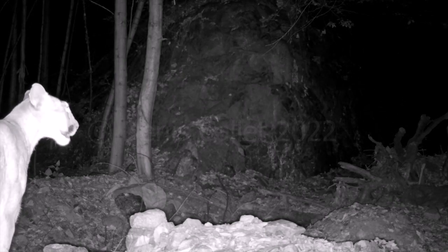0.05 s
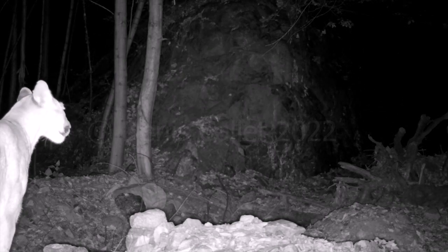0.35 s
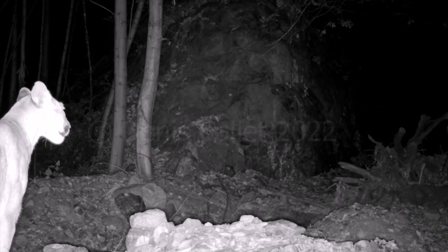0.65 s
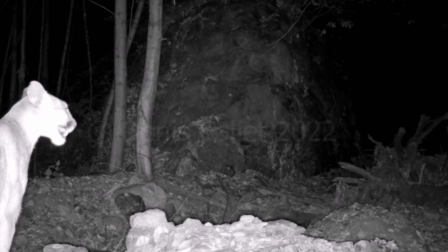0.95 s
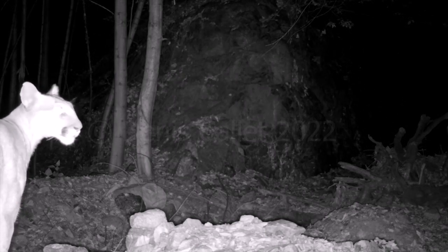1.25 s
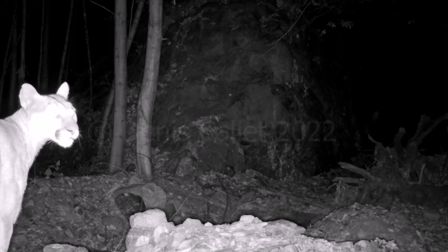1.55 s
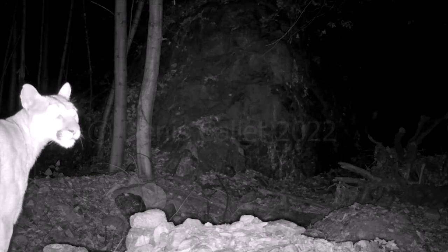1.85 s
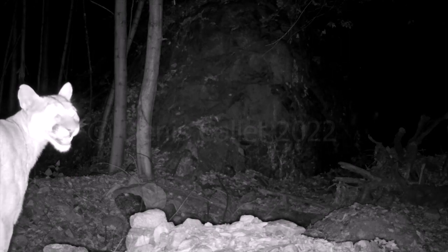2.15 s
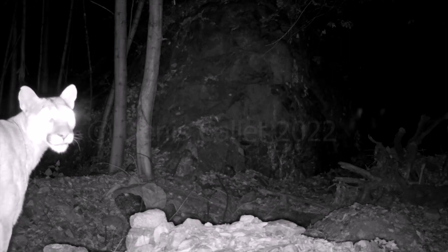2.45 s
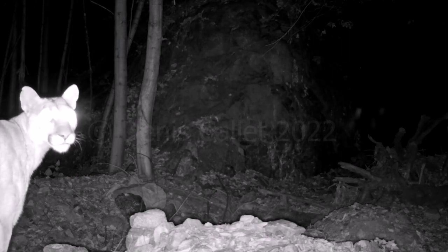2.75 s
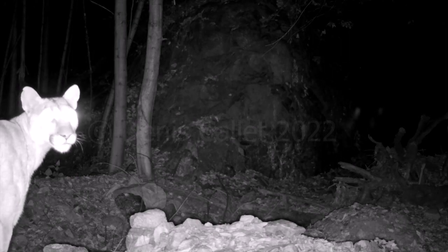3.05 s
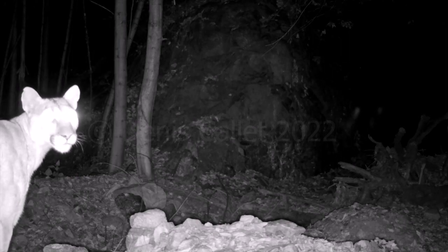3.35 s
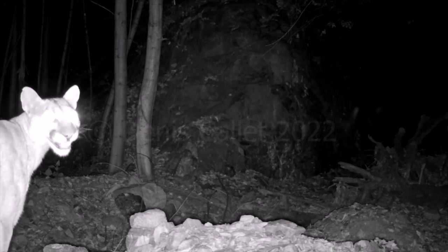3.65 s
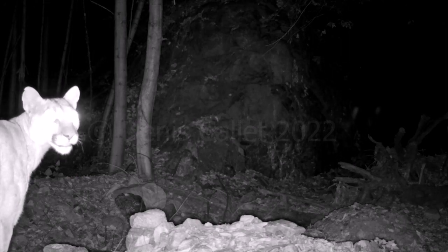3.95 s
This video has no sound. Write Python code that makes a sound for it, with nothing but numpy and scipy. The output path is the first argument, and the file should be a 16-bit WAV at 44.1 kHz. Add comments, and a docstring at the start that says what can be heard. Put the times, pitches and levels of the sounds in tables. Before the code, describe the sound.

A wild cat chirps five times, some clear, some hoarse, with crickets behind.

```python
"""Night forest: a mountain lion gives five short whistled chirps, some clear, some hoarse.
Vocal folds flutter the whistle, throat turbulence rasps, air hisses through the closing jaw.
Crickets pulse their wings over a steady rush; trunks and leaves return a faint echo.
One faint tick; later a small distant animal rattles. A trail camera adds hiss and a thin whine,
and its gain control ducks everything after the loud calls."""
import sys
import numpy as np
from scipy import signal
from scipy.fft import rfft, irfft, next_fast_len
from scipy.io import wavfile
from scipy.ndimage import uniform_filter1d

SR = 44100
rng = np.random.default_rng(int(sys.argv[2]) if len(sys.argv) > 2 else 0)


def store_wav(level_fs):
    """Save 16-bit WAV to argv[1]."""
    pcm = np.round(np.clip(np.atleast_2d(level_fs), -1, 1) * 32767)
    wavfile.write(sys.argv[1], SR, pcm.T.astype(np.int16))


N = 176400

# background spectrum: (frequency [Hz], relative density [dB])
RUSH_SPECTRUM = [(15, -43), (30, -21), (60, -10.5), (112, -8.5), (200, -5), (360, -1), (750, 0.5),
                 (1500, -2), (2240, -6), (3010, -11.5), (3500, -11), (4100, -15.5), (4400, -22),
                 (5200, -27.5), (6400, -41), (8000, -51.5), (15000, -76)]
# wing strokes of one chirp: (relative level [dB])
STROKE_LEVELS_DB = [4.5, 3.5, -8.5]
# nearest cricket: (time [s], relative level [dB])
NEAR_CRICKET_CHIRPS = [(0.269, -31.5), (0.647, -27), (1.002, -28), (1.435, -30.5), (1.841, -28.5),
                       (2.217, -30), (2.6, -27), (3.003, -27.5), (3.395, -30.5), (3.78, -25.5)]
# farther, lower crickets: (time [s], pitch [Hz], relative level [dB])
FAR_CRICKET_CHIRPS = [(.232, 3830, -28), (.555, 3746, -27.5), (.85, 3820, -26.5), (1.205, 3866, -28),
                      (1.538, 3770, -25.5), (1.815, 3840, -26), (1.935, 3840, -25), (2.13, 3750, -27),
                      (2.477, 3730, -27), (2.773, 3780, -26), (2.858, 3756, -24.5), (3.17, 3800, -23.5),
                      (3.335, 3736, -24), (3.538, 3896, -23.5), (3.86, 3815, -25)]
# lion, one contour per note; call 3 is two overlapping notes:
# (time [s], pitch [Hz], whistle level [dB], roughness [0-1], air level [dB])
LION_NOTES = [
    [(.268, 1373, -25, .6, -40), (.281, 1439, -16.5, 0.6, -27), (.29, 1516, -13.5, .5, -23.5),
     (.3, 2024, -22, 0.92, -16.5), (.312, 2320, -18.5, 0.9, -15.5), (.326, 2125, -23.5, .95, -23),
     (.335, 1553, -17, .85, -26.5), (.345, 1330, -20, .8, -24.5), (.36, 1100, -40, .7, -41.5)],
    [(.84, 1445, -43, 0.2, -39.5), (.865, 1629, -23, 0.2, -32), (.9, 1800, -19, 0.1, -32.5),
     (.927, 1754, -13.5, .5, -31), (.95, 1558, -19, 0.54, -28.5), (.968, 1260, -17.5, 0.6, -30),
     (.986, 1107, -12.5, 0.28, -31.5), (1.016, 970, -44, 0.3, -40)],
    [(2.07, 940, -25, 0.33, -35), (2.082, 1071, -13, 0.14, -28), (2.1, 1257, -19, 0.8, -20),
     (2.128, 1742, -18, .6, -24.5), (2.16, 1670, -11, 0.82, -20.5), (2.173, 1282, -15, 0.9, -18.5),
     (2.183, 1198, -6.5, 0.1, -18.5), (2.212, 1147, -3, .24, -19), (2.243, 1099, 0.5, 0.06, -13.5),
     (2.256, 1007, -5.5, 0.1, -11), (2.268, 960, -17.5, 0.1, -16), (2.295, 859, -20.5, .25, -28.5),
     (2.326, 730, -23, .25, -45)],
    [(2.264, 1167, -6, 0.4, -33), (2.294, 1050, -12, .15, -37), (2.324, 950, -30, .2, -47)],
    [(2.448, 1114, -24.5, 0.2, -46.5), (2.468, 1275, -21, 0.6, -44), (2.483, 1545, -12.5, 0.4, -28.5),
     (2.488, 1740, -25, .95, -20.5), (2.494, 2337, -18, 0.53, -20.5), (2.518, 2565, -16.5, 0.62, -25.5),
     (2.528, 2340, -21.5, .9, -21.5), (2.535, 1557, -20.5, 0.8, -24), (2.56, 1010, -29, .8, -40.5)],
    [(3.635, 937, -22, .85, -42.5), (3.667, 969, -23.5, .4, -26.5), (3.681, 1075, -7.5, .15, -31),
     (3.692, 1143, -9, 0.2, -31), (3.7, 1130, -10.5, .13, -27), (3.738, 1089, -4, 0.11, -18.5),
     (3.76, 1024, -6.5, 0.06, -18.5), (3.797, 1021, -6.5, .35, -23.5), (3.812, 992, -13.5, 0.42, -22.5),
     (3.82, 972, -21, 0.64, -27), (3.855, 955, -25, .8, -42)],
]
# hoarse air, per note: (treble gain [dB])
AIR_TREBLE_DB = [1, 5, -5, -4, 2.5, -6]
# whistle partials: (pitch multiple, relative level [dB])
WHISTLE_HARMONICS = [(1, -0.5), (2, -29.5), (3, -35.5)]
# air through the mouth: (frequency [Hz], relative density [dB])
MOUTH_SPECTRUM = [(500, -39), (1000, -8), (1580, -1.5), (1900, -0.5), (2400, -10), (2800, -6.5),
                  (3100, -11), (3450, -4.5), (3850, -10), (4300, -22), (4650, -18), (4900, -14),
                  (5200, -16.5), (5480, -19.5), (5850, -27), (6300, -27.5), (7000, -43), (12000, -65)]
# main mouth resonance, falls as the jaw closes: (time [s], frequency [Hz])
JAW_RESONANCE = [(.29, 2100), (.31, 2308), (.35, 2230), (.93, 2280), (1, 2050), (2.09, 2450), (2.11, 2740),
                 (2.165, 2760), (2.21, 2290), (2.26, 1910), (2.49, 2380), (2.52, 2600), (2.54, 2350),
                 (3.67, 2524), (3.73, 2140), (3.8, 2000)]
# resonances near the microphone: (frequency [Hz], gain [dB], t60 [s])
RING_MODES = [(2364, 2, 0.24), (3340, 0, .13), (3430, 1, .13), (4930, 7.5, 0.23), (5500, 5, .22),
              (5600, 4, .22)]
# distant animal: (time [s], level [dB])
RATTLE_PULSES = [(3.053, -22.5), (3.095, -24), (3.135, -22), (3.175, -26), (3.212, -30.5)]

STROKE_S, RATTLE_PULSE_S = .017, .016


def amp(db):
    """dB to gain."""
    return 10 ** (np.asarray(db) / 20)


def unit(x):
    """Scale to rms 1."""
    return x / np.sqrt(np.mean(x ** 2) + 1e-20)


def add(mix, start_s, sound):
    """Mix in at start_s."""
    part = mix[max(round(start_s * SR), 0):][:len(sound)]
    part += sound[:len(part)]


def colour(spectrum, hz):
    """Gain of a spectrum at hz."""
    points_hz, db = np.transpose(spectrum)
    return amp(np.interp(np.log(hz + 1), np.log(points_hz), db))


def wobble(n, rate_hz):
    """Smooth random motion, rms near 1."""
    size = next_fast_len(n + 4096)
    lowpass = np.exp(-.5 * (np.fft.rfftfreq(size, 1 / SR) / rate_hz) ** 2)
    return unit(irfft(rfft(rng.standard_normal(size)) * lowpass))[:n]


def rush(level_db=-22.5, patch_db=.96):
    """Steady broad rush with faint drifting patches."""
    hz = np.fft.rfftfreq(1024, 1 / SR)
    real, imag, patches = rng.standard_normal((3, N // 256 + 5, len(hz)))
    patches = uniform_filter1d(patches, size=12, axis=0)
    patches = unit(uniform_filter1d(patches, size=12, axis=1))
    frames = (real + 1j * imag) * colour(RUSH_SPECTRUM, hz) * amp(patch_db * patches)
    return amp(level_db) * unit(signal.istft(frames.T, nperseg=1024, noverlap=768)[1][:N])


def electronics(hiss_db=-51, whine_db=-57, whine_hz=7804, buzz_hz=29.8):
    """White hiss and a thin whine that buzzes as its polarity flips."""
    t = np.arange(N) / SR
    polarity = np.tanh(8 * np.sin(2 * np.pi * buzz_hz * t))
    whine = np.sqrt(2) * np.sin(2 * np.pi * whine_hz * t) * polarity
    return amp(whine_db) * whine + amp(hiss_db) * rng.standard_normal(N)


def cricket_chirp(hz, period_s=.032, sag_hz=130, scrape_depth=.0094, scrape_hz=116):
    """Three wing strokes, each a scraped tone sagging in pitch."""
    t = np.arange(0, STROKE_S, 1 / SR)
    progress, chirp = t / STROKE_S, np.zeros(SR // 6)
    envelope = np.sqrt(2) * np.sin(np.pi * progress)
    for k, db in enumerate(STROKE_LEVELS_DB):
        scrape = 1 + scrape_depth * wobble(SR // 10, scrape_hz)[:len(t)]
        pitch_hz = hz * scrape + sag_hz * (.5 - progress)
        phase = 2 * np.pi * (np.cumsum(pitch_hz) / SR + rng.random())
        add(chirp, k * period_s, amp(db) * envelope * np.sin(phase))
    return chirp


def crickets(near_hz=3985, chorus_hz=3781, spread_hz=294, chorus_per_s=140, chorus_db=-30):
    """One near cricket, a few farther off, a random chorus behind."""
    near, far, chorus = np.zeros((3, N))
    for s, db in NEAR_CRICKET_CHIRPS:
        add(near, s - STROKE_S / 2, amp(db) * cricket_chirp(near_hz))
    for s, hz, db in FAR_CRICKET_CHIRPS:
        add(far, s - STROKE_S / 2, amp(db) * cricket_chirp(hz))
    count = round(chorus_per_s * N / SR)
    for k, (offset, up, down) in enumerate(rng.random((count, 3))):
        add(chorus, (k + offset) / chorus_per_s, cricket_chirp(chorus_hz + spread_hz * (up - down)))
    echo = amp(-6.5) * trees(near + far, t60_s=.57)
    chorus = unit(chorus + trees(chorus, t60_s=.48))
    return near + amp(-2.5) * far + echo + amp(chorus_db) * chorus


def trees(x, t60_s):
    """Sparse, decaying reflections off trunks."""
    t = np.arange(SR) / SR
    taps = rng.standard_normal(SR) * (rng.random(SR) < .05)
    taps *= amp(-60 * t / t60_s) * (t > .006)
    return signal.fftconvolve(x, taps / np.linalg.norm(taps))[:N]


def lion_note(contour, treble_db):
    """Arched whistle plus hoarse air; a rough throat adds flutter and rasp. Returns (start_s, sound)."""
    jitter_depth, jitter_hz, shimmer_depth, shimmer_hz = .06, 280, .3, 220
    fold_hz, fold_depth, fold_drift = 399.5, .43, .12
    throat_hz, throat_width_hz, throat_db = 2040, 130, 11
    voice_top_hz, fade_s = 3400, .0077
    times_s, *columns = np.transpose(contour)
    t = np.arange(times_s[0], times_s[-1], 1 / SR)
    hz, whistle_db, rough, air_db = (np.interp(t, times_s, column) for column in columns)
    drift = lambda rate_hz: wobble(SR // 2, rate_hz)[:len(t)]
    phase_of = lambda f: 2 * np.pi * np.cumsum(f) / SR
    band = lambda angle, width_hz: drift(width_hz) * np.sin(angle) + drift(width_hz) * np.cos(angle)
    throat = lambda f: amp(throat_db / (1 + ((f - throat_hz) / throat_width_hz) ** 2))

    phase = phase_of(hz * (1 + jitter_depth * rough * drift(jitter_hz)))
    flutter = fold_depth * np.sin(phase_of(fold_hz * (1 + fold_drift * drift(shimmer_hz))))
    whistle = np.zeros(len(t))
    for k, db in WHISTLE_HARMONICS:
        lift = throat(k * hz) if k > 1 else 1  # throat resonance, overtones only
        whistle += np.sqrt(2) * amp(db) * lift * np.sin(k * phase)
    whistle *= np.sqrt(1 - rough ** 2)
    whistle *= 1 + rough * (flutter + shimmer_depth * drift(shimmer_hz))

    # throat turbulence: noise bands on the pitch and its octave
    rasp_width_hz = .19 * hz.mean()
    rasp = band(phase, rasp_width_hz)
    rasp += amp(-4) * colour(MOUTH_SPECTRUM, 2 * hz) * band(2 * phase, rasp_width_hz)
    voice = amp(whistle_db) * (whistle + rough * amp(-.5) * rasp)
    voice = signal.sosfilt(signal.butter(4, voice_top_hz, fs=SR, output="sos"), voice)

    jaw_hz = np.interp(t, *np.transpose(JAW_RESONANCE))
    resonance = amp(-3) * band(phase_of(jaw_hz), width_hz=150)
    air = amp(air_db) * (mouth_air(jaw_hz, treble_db) + resonance)
    fade = np.clip(np.minimum(t - times_s[0], times_s[-1] - t) / fade_s, 0, 1)
    return times_s[0], fade * (voice + air)


def mouth_air(jaw_hz, treble_db, split_hz=3160, open_hz=2390, db_per_octave=15.5):
    """Turbulence through the mouth resonances; a closing jaw muffles the treble."""
    hz, n = np.fft.rfftfreq(SR, 1 / SR), len(jaw_hz)
    noise = unit(irfft(rfft(rng.standard_normal(SR)) * colour(MOUTH_SPECTRUM, hz)))
    low = irfft(rfft(noise) * (hz <= split_hz))[:n]
    high = noise[:n] - low
    return low + high * amp(treble_db + db_per_octave * np.log2(jaw_hz / open_hz))


def ring(x):
    """Narrow resonances near the microphone, set off by the calls."""
    t = np.arange(SR // 2) / SR
    response = np.zeros(len(t))
    for hz, db, t60_s in RING_MODES:
        unity_peak = 2 * np.log(1000) / (t60_s * SR)
        response += unity_peak * amp(db - 60 * t / t60_s) * np.cos(2 * np.pi * hz * t)
    return signal.fftconvolve(x, response)[:N]


def forest_echo(x, leaves_above_hz=4400):
    """Short echo off trunks; foliage scatters the treble for longer."""
    treble = irfft(rfft(x) * (np.fft.rfftfreq(N, 1 / SR) > leaves_above_hz), N)
    return amp(-15) * trees(x, t60_s=.28) + amp(-6) * trees(treble, t60_s=.59)


def tick(level_db=-26, hz=5200, width_hz=600, decay_s=.002):
    """Faint, high tick: a fast-decaying noise band."""
    t = np.arange(SR // 20) / SR
    band = wobble(len(t), width_hz) * np.sin(2 * np.pi * hz * t)
    return amp(level_db) * np.exp(-t / decay_s) * band


def rattle_pulse(level_db, hz=2255, width_hz=180):
    """One buzzy pulse of a small distant animal's rattle."""
    t = np.arange(0, RATTLE_PULSE_S, 1 / SR)
    buzz = unit(wobble(SR // 10, width_hz)[:len(t)] * np.sin(2 * np.pi * hz * t))
    return amp(level_db) * np.sin(np.pi * t / RATTLE_PULSE_S) * buzz


def scene():
    """Lion, echo and ringing over the night background; mono."""
    background, lion = rush() + electronics() + crickets(), np.zeros(N)
    add(background, start_s=.807, sound=tick())
    for s, db in RATTLE_PULSES:
        add(background, s - RATTLE_PULSE_S / 2, rattle_pulse(db))
    for contour, treble_db in zip(LION_NOTES, AIR_TREBLE_DB):
        add(lion, *lion_note(contour, treble_db))
    return (background + lion + forest_echo(lion) + ring(lion))[None]


def record(dry):
    """Gain control (fast duck, slow recovery), end fades, band limit."""
    threshold_db, excess_share, start_duck_db = -20.5, .41, 4
    attack_s, recover_s, hop, cutoff_hz = .022, .39, 64, 15080
    power = uniform_filter1d(dry[0] ** 2, size=441)[::hop]
    level_db = 10 * np.log10(abs(power) + 1e-12)
    duck_db = [start_duck_db]
    for target_db in excess_share * np.maximum(level_db - threshold_db, 0):
        lag_s = attack_s if target_db > duck_db[-1] else recover_s
        duck_db.append(duck_db[-1] + (target_db - duck_db[-1]) * (1 - np.exp(-hop / SR / lag_s)))
    ducked = dry / amp(np.interp(np.arange(N) / hop, np.arange(len(duck_db)), duck_db))
    faded = ducked * signal.windows.tukey(N, .002)
    lowpass = signal.firwin(511, cutoff_hz, window=("kaiser", 9), fs=SR)
    return signal.oaconvolve(faded, lowpass[None], "same")


dry = scene()
out = record(dry)
store_wav(out)
```